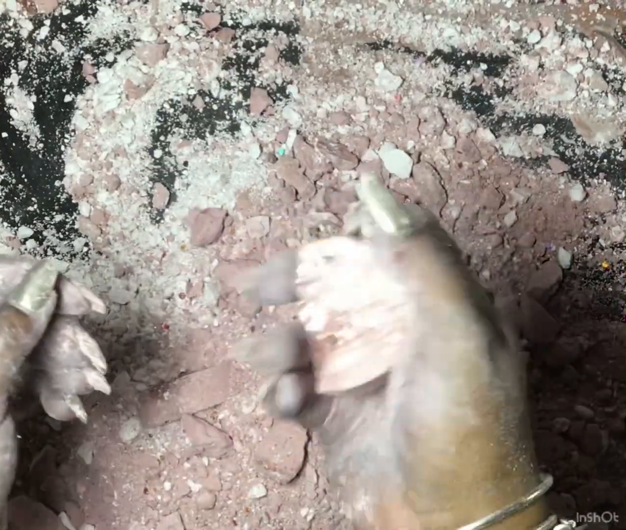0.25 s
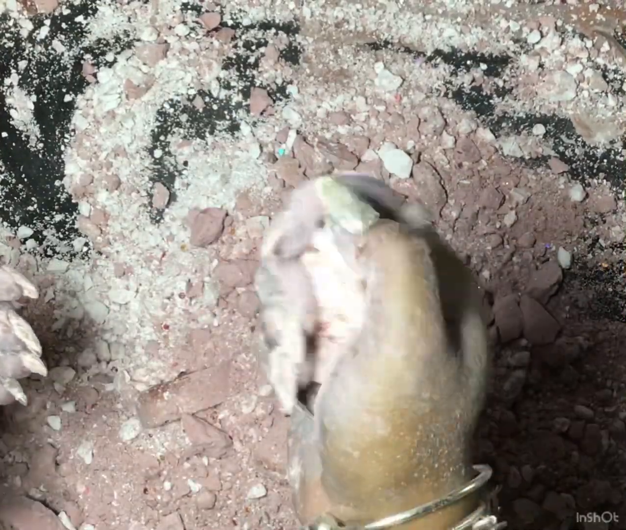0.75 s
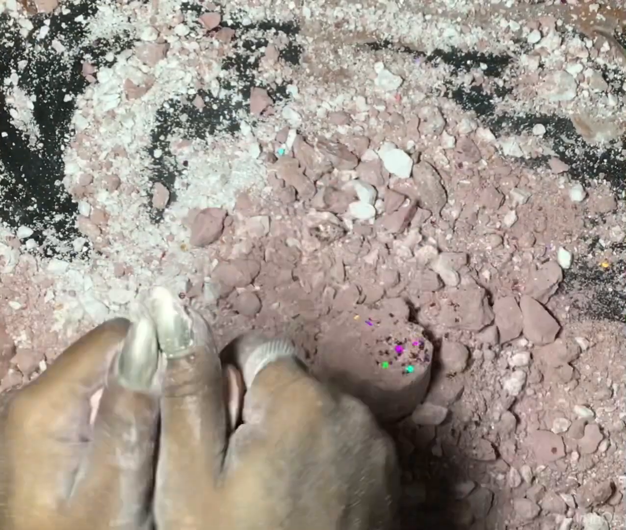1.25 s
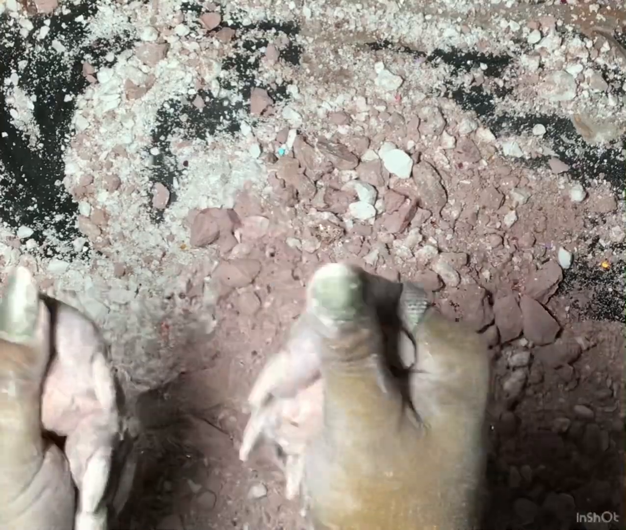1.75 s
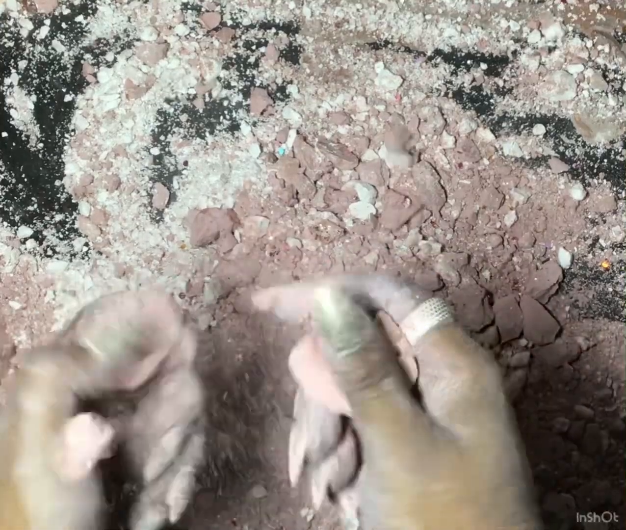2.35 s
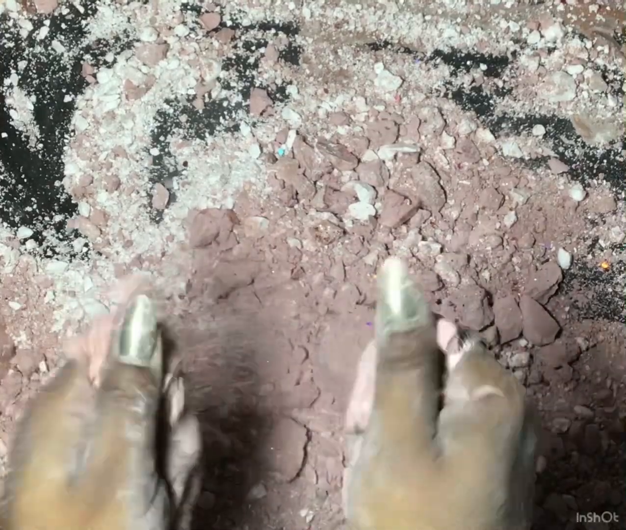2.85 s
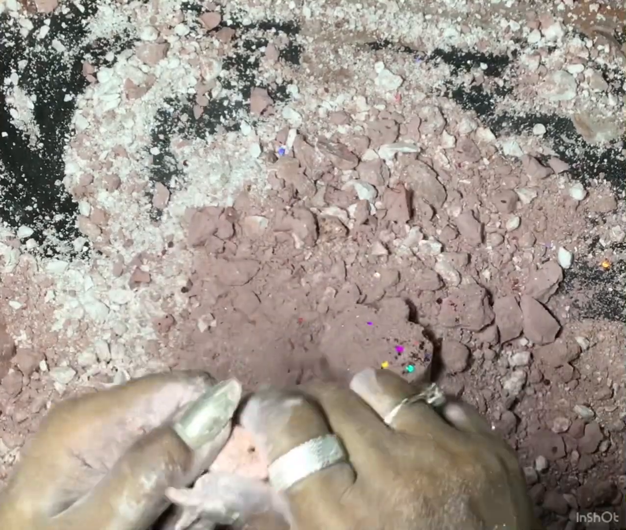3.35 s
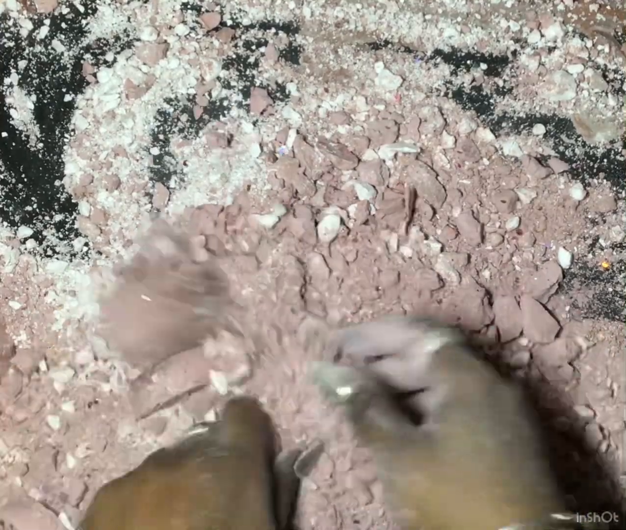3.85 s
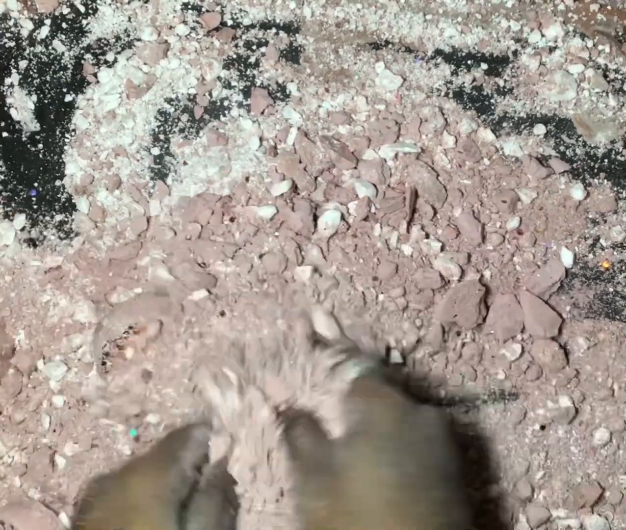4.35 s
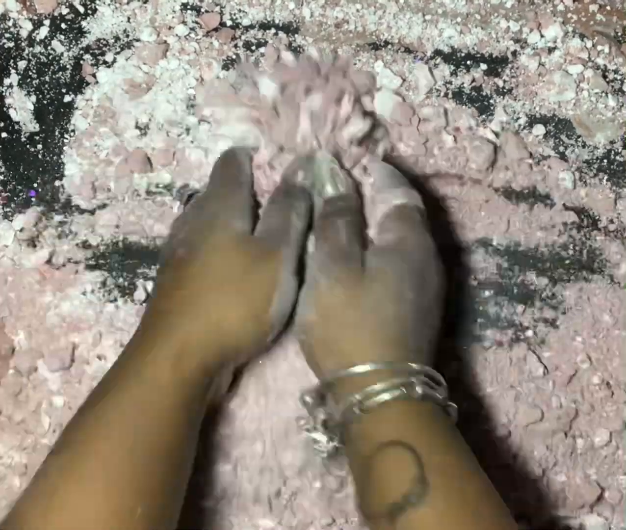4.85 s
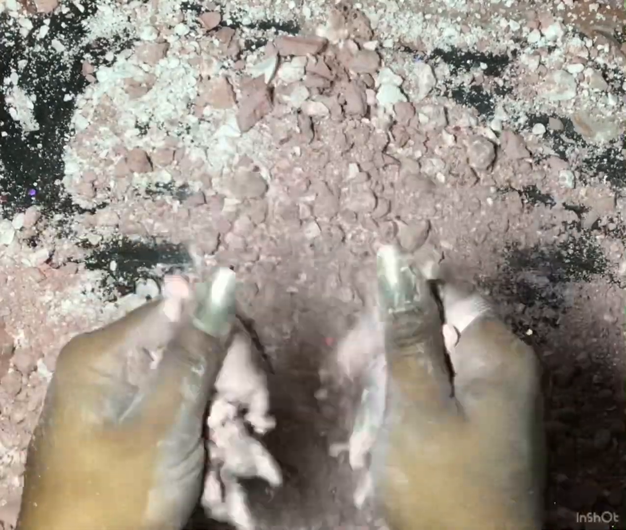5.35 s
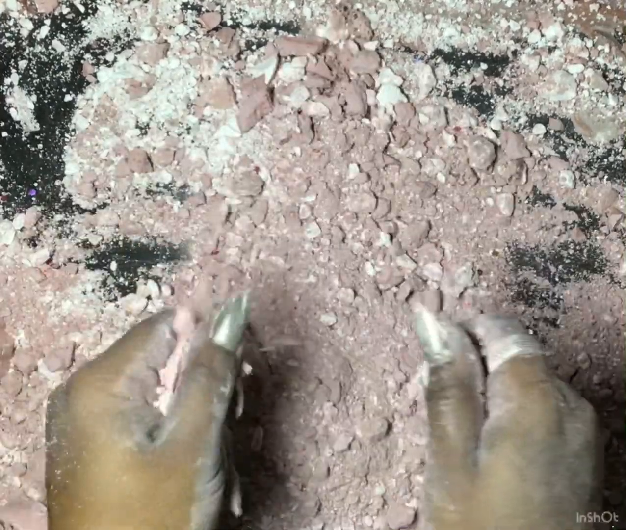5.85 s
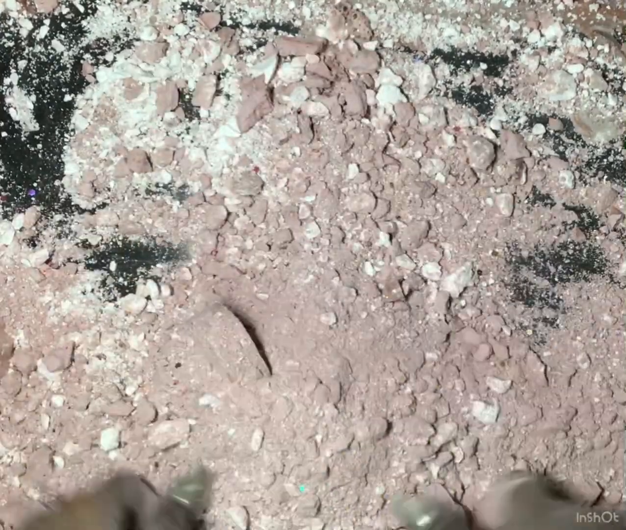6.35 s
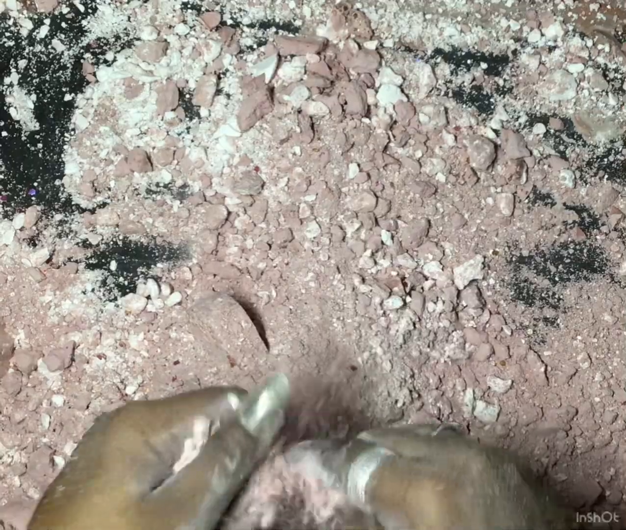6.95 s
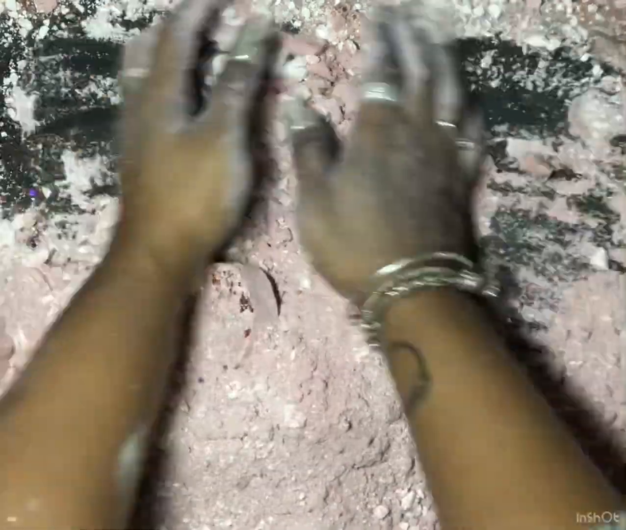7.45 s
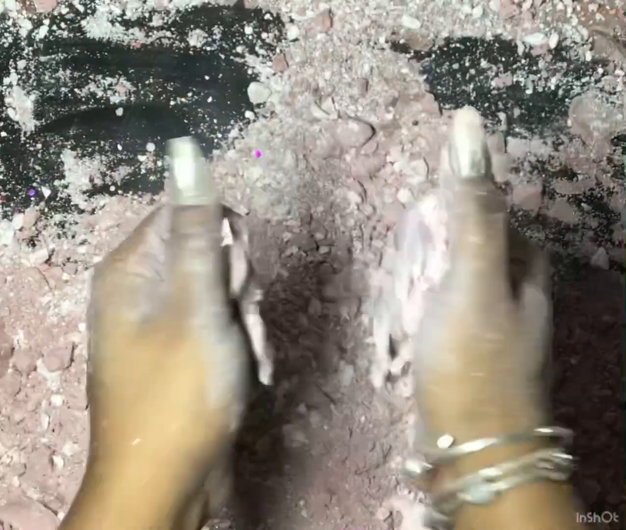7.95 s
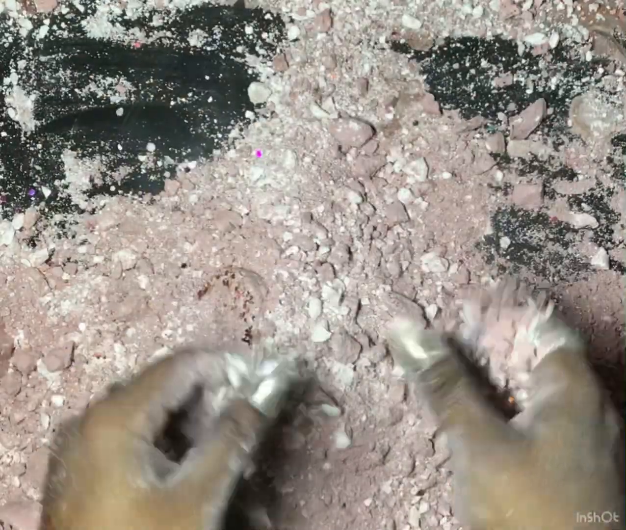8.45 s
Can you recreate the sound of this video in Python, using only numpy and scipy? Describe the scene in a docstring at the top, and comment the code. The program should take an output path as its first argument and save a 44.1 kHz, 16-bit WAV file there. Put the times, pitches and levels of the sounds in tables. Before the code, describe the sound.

Dry chalk chunks are snapped and crushed by hand close up, with sharp crackly crunches, soft tray thuds and sifting powder in a quiet room.

```python
"""Hands crush chalk chunks over a tray in a small quiet room, close to a phone.
Pieces snap as sharp bursts of noise, and lumps thud on the tray as short, uneven low tones.
Crumbs and powder sift and scrape: streams of random clicks, filtered into four pitch ranges.
Tray resonances and decaying noise echoes add a short tail, over steady noise shaped as
the room's hum and the microphone's hiss."""
import sys
import numpy as np
from scipy import signal
from scipy.fft import rfft, irfft
from scipy.io import wavfile

SR = 44100
rng = np.random.default_rng(int(sys.argv[2]) if len(sys.argv) > 2 else 0)


def dump_mix(stems):
    """Bounce the given channels to the path in sys.argv[1] as a 16-bit WAV at rate SR."""
    frames = np.atleast_2d(stems).T  # one column per channel
    limited = np.clip(frames, -1, 1)  # hard clip at full scale
    pcm = np.round(limited * 32767).astype(np.int16)
    wavfile.write(sys.argv[1], SR, pcm)


N = 384111  # length in samples, about 8.7 s


def undb(db):
    """Turns decibels into a plain multiplier."""
    return 10 ** (np.asarray(db) / 20)


def unit(x):
    """Scales a sound to an average (RMS) level of 1."""
    return x / np.sqrt(np.mean(x ** 2))


def band(x, lo_hz, hi_hz, order=2):
    """Keeps mainly the pitches between two limits."""
    return signal.sosfilt(signal.butter(order, [lo_hz, hi_hz], "bandpass", fs=SR, output="sos"), x)


def ring(x, hz, width_hz):
    """One resonance, with gain 1 at its centre; the narrower it is, the longer it rings."""
    return signal.lfilter(*signal.iirpeak(hz, hz / width_hz, fs=SR), x)


def add(out, s, sound, db):
    """Lays a short sound into out at s seconds with its peak at db."""
    start = int(s * SR)
    sound = sound[:N - start]
    out[start:start + len(sound)] += sound * undb(db) / np.max(np.abs(sound))


def grains(per_s, scatter_db, cap_db=6.0):
    """Random clicks of either sign, many small and few large, as when crumbs collide."""
    hit, size, sign = rng.random((3, N))
    click_db = np.minimum(-scatter_db * np.log(1 - size), cap_db)
    return (hit < per_s / SR) * undb(click_db) * np.sign(sign - .5)


# Tone of the quiet room. Each row: pitch in Hz, relative strength in dB per Hz.
QUIET_TONE = [(18, -51), (30, -19), (106, 0), (165, -10), (239, -2.5), (273, -11.5), (394, -7.5),
              (649, -13.5), (721, -9.5), (822, -14.5), (1160, -15.5), (1430, -18), (16000, -23)]
QUIET_DB = -58.5  # average level


def quiet():
    """Low room hum and the even hiss of the microphone, as noise with a fixed tone."""
    hz, db = np.transpose(QUIET_TONE)
    noise_hz = np.arange(1, N // 2 + 2) * SR / N
    colour = undb(np.interp(np.log(noise_hz), np.log(hz), db))
    noise = irfft(rfft(rng.standard_normal(N)) * colour, N)
    return undb(QUIET_DB) * unit(noise)


# Resonances of the tray. Each row: pitch in Hz, width in Hz, relative level in dB.
TRAY_RINGS = [(109, 11.3, 11), (733, 11, 9), (900.6, 19, 15), (1466, 60, 12.5), (1907, 55, 12.5),
              (2400, 39, 9.5), (2840, 31, -26), (3470, 16.3, 8.5), (5320, 240, 8.5)]


def room(x, near_s=0.0073, near_db=-10.5, t60_s=0.13, tail_db=-10.0, ring_db=-9.5, shift_hz=3.3):
    """Hands and tray reflect at once, the tray rings, the walls leave a short, duller tail."""
    t = np.arange(int(.3 * SR)) / SR
    out = x + sum(undb(db + ring_db) * ring(x, hz, width) for hz, width, db in TRAY_RINGS)
    turn = 2 * np.pi * shift_hz * np.arange(N) / SR
    # the hands keep moving, so the echoes drift between two patterns
    for share in np.cos(turn), np.sin(turn):
        near = rng.standard_normal(len(t)) * np.exp(-t / near_s)
        tail = rng.standard_normal(len(t)) * np.exp(-np.log(1000) * t / t60_s)  # 60 dB down at t60_s
        near = band(near, 1300, 14600, order=1)
        tail = band(tail, 190, 8400, order=1)
        echo = undb(near_db) * near / np.linalg.norm(near)
        echo += undb(tail_db) * tail / np.linalg.norm(tail)
        out += signal.fftconvolve(x * share, echo)[:N]
    return out


# Level of the top treble: full while chunks break in the raised hands, often less down on the tray.
# Each row: time in seconds, gain in dB.
TREBLE_GAIN = [(1.0, -4.5), (2.0, 3), (3.2, 6.5), (3.799, -0.5), (4.2, -1.5), (4.7, -1), (5.25, -9),
               (5.6, -15), (6.1, 5), (7.1, -3.5), (8.7, -18)]


def top_treble(chalk):
    """The top treble swells and fades: a filtered copy is added or taken away."""
    gain_db = np.interp(np.arange(N) / SR, *np.transpose(TREBLE_GAIN))
    return chalk + (undb(gain_db) - 1) * band(chalk, 10100, 16000, order=1)


# How far a band near 5 kHz dips, mostly deeper once the work moves down to the tray.
# Each row: time in seconds, share taken out from 0 to 1.
DIP_SHARE = [(1.0, .2), (3.2, 0.6), (3.8, 0.75), (7.0, 0.35), (7.4, 0.55), (8.0, 1), (8.7, 0)]
DIP_HZ, DIP_WIDTH_HZ = 5140, 1900


def treble_dip(chalk):
    """Takes a changing share of one band out of the chalk sound."""
    share = np.interp(np.arange(N) / SR, *np.transpose(DIP_SHARE)).clip(0, 1)
    return chalk - share * ring(chalk, DIP_HZ, DIP_WIDTH_HZ)


# Hand movements that set loose chalk going. Each row: time in seconds when full level is reached,
# seconds it holds, then levels in dB of tray rumble, crumb rattle, fine grit and powder hiss.
HAND_STROKES = [(1.361, .025, -69, -75, -67.5, -61.5), (1.622, .03, -60.5, -82, -65, -77),
                (1.817, .04, -74, -84, -66, -83), (2.126, .11, -51.5, -68, -57.5, -63),
                (2.281, 0.14, -57.5, -51.5, -53.5, -54), (2.469, .03, -64.5, -69, -70, -56.5),
                (2.803, .02, -63.5, -68, -61, -74), (2.948, .03, -60, -65, -54, -73),
                (3.032, 0.039, -47, -56, -68.5, -70), (3.44, 0.032, -75, -67, -75, -63.5),
                (3.903, .065, -45, -53.5, -57.5, -79), (4.035, .05, -49.5, -59, -65, -81),
                (4.127, .09, -45, -51.5, -56, -66), (4.277, .1, -59, -64, -63.5, -79),
                (4.407, .025, -63, -61, -55, -69), (4.538, .15, -51, -53, -53.5, -70),
                (4.74, 0.073, -45.5, -50, -47.5, -53), (4.874, .12, -49, -57, -59.5, -81),
                (5.043, .06, -53.5, -62, -57, -55), (5.2, .13, -50.5, -60, -54, -60),
                (5.629, .2, -57.5, -76, -63.5, -82), (5.998, .03, -71, -65, -63.5, -66),
                (6.307, 0.037, -59.5, -59, -53.5, -79), (6.405, .08, -55, -60, -63.5, -84),
                (6.56, .1, -62, -62, -66.5, -81), (6.752, 0.022, -66, -75, -64.5, -63),
                (6.846, .05, -65, -76, -63.5, -76), (7.242, 0.033, -55.5, -62, -60.5, -57.5),
                (7.33, .12, -43.5, -49, -46.5, -54.5), (7.471, .13, -43, -59, -47, -50.5),
                (7.741, .1, -49.5, -48.5, -45, -58), (7.862, .05, -62, -71, -58.5, -71),
                (8.054, .07, -57.5, -61, -60, -75), (8.541, .2, -52, -54.5, -56, -61)]
RISE_DB_PER_S, FALL_DB_PER_S = 405, 280.5  # how a movement swells and dies away
# Fingers never quite still: levels in dB of rumble, rattle, grit and hiss.
RESTLESS_DB = (-66, -73.5, -73.5, -73)
RESTLESS_FROM_S = 1.1  # they grow over the next second


def motion():
    """Levels in dB of rumble, rattle, grit and hiss: every movement rises, holds and dies away."""
    t = np.arange(N) / SR
    power = undb(RESTLESS_DB)[:, None] ** 2 * np.clip(t - RESTLESS_FROM_S, .001, 1)
    for s, hold_s, *db in HAND_STROKES:
        rise_db = RISE_DB_PER_S * (t - s)
        fall_db = FALL_DB_PER_S * (s + hold_s - t)
        shape_db = np.minimum(0, np.minimum(rise_db, fall_db))
        power = power + undb(db)[:, None] ** 2 * undb(2 * shape_db)  # doubled dB: power, not amplitude
    return 10 * np.log10(power)


def sifting(rumble_db, rattle_db, grit_db, hiss_db, slide_db=4.0):
    """Lumps drag on the tray, crumbs and grit rattle in small slides, powder falls as a dense hiss."""
    slides = undb(slide_db * unit(band(rng.standard_normal(N), 12.0, 45, order=1)))
    rumble = unit(band(grains(500, 2.0), 86, 307))
    rattle = unit(band(slides * grains(900, 2.9), 333, 1000))
    grit = unit(band(slides * grains(2200, 2.7), 1270, 3400, order=1))
    hiss = unit(band(np.sqrt(slides) * grains(11000, 4.8), 4400, 10500))
    low = undb(rumble_db) * rumble + undb(rattle_db) * rattle
    high = undb(grit_db) * grit + undb(hiss_db) * hiss
    return low + high


# Lumps and palms landing on the tray. Each row: start in seconds, peak in dB, pitch in Hz.
TRAY_THUDS = [(1.107, -29.5, 199), (1.64, -35, 271), (1.648, -46, 300), (1.659, -41, 260),
              (1.673, -51, 260), (2.076, -30.5, 168), (3.046, -34, 173), (3.239, -27.5, 224),
              (3.708, -31, 313), (3.911, -30, 196), (3.934, -30, 150), (3.964, -26, 162), (4.006, -34, 215),
              (4.028, -25, 214), (4.039, -25.5, 200), (4.217, -39, 229), (5.982, -39, 249),
              (4.051, -22, 227), (4.147, -26.5, 235), (4.178, -20, 230), (4.2, -26, 213),
              (4.7328, -14, 380), (4.742, -38, 275), (4.781, -29, 210), (4.9, -26, 324), (4.956, -29, 226),
              (5.152, -34, 235), (5.25, -32.5, 247), (5.588, -31.5, 340), (6.057, -28, 372),
              (6.406, -23, 221), (7.055, -39.5, 209), (7.325, -30, 207), (7.357, -27, 201),
              (7.402, -25, 230), (7.417, -28.5, 200), (7.426, -25, 460), (7.434, -35, 230),
              (7.469, -35, 197), (7.495, -29, 330), (7.511, -24, 325), (7.531, -27, 230), (7.598, -37, 317),
              (7.565, -29, 203), (7.608, -41, 269), (7.687, -30.5, 228), (7.747, -33, 296),
              (7.985, -30.5, 323), (8.034, -24, 613), (8.0399, -20.5, 580), (8.041, -20.5, 300),
              (8.047, -29, 540), (8.532, -35, 311), (8.685, -35, 152)]


def thuds(turns=1.26, push_s=0.00055, rough=0.57):
    """A soft blow bends the tray for a few cycles; its other modes make the ring uneven."""
    out, t = np.zeros(N), np.arange(int(.12 * SR)) / SR
    for s, db, hz in TRAY_THUDS:
        uneven = unit(band(rng.standard_normal(len(t)), 0.46 * hz, 1.39 * hz))
        swing = (1 - np.exp(-t / push_s)) * np.exp(-t * hz / turns)
        blow = (rough * uneven - np.sin(2 * np.pi * hz * t)) * swing
        add(out, s, band(blow, 66, 1140, order=1), db)
    return out


# Small breaks at random moments; the snap and knock levels count from the grit level,
# the splinter level from the powder hiss level.
CHIP_COUNT, CROWDING = 80, 0.54  # more crowding: more of them fall where the chalk moves most
CHIP_DB, CHIP_KNOCK_DB, CHIP_SPLINTER_DB, CHIP_SCATTER_DB = -2, 8.5, 19.5, 5
CHIP_HZ, PITCH_SPREAD = 2515, 0.26  # middle snap pitch, and its spread as a natural-log ratio


def scattered(level_db, count):
    """Random moments, denser where the level is high: time, level there, and four chance values each."""
    share = np.cumsum(undb(CROWDING * level_db))
    target = (np.arange(count) + rng.random(count)) / count * share[-1]
    i = np.searchsorted(share, target).clip(0, N - 99)
    return i / SR, level_db[i], rng.standard_normal((count, 4)).T


def chips(grit_db, hiss_db):
    """Crumbs that break among the moving chalk, as rows for cracks(); brighter where powder flies."""
    s, db, (a, b, c, d) = scattered(grit_db, count=CHIP_COUNT)
    snap_db = db + CHIP_DB + CHIP_SCATTER_DB * a
    snap_hz = CHIP_HZ * np.exp(PITCH_SPREAD * b)
    knock_db = db + CHIP_KNOCK_DB + CHIP_SCATTER_DB * c
    splinter_db = hiss_db[(s * SR).astype(int)] + CHIP_SPLINTER_DB + CHIP_SCATTER_DB * d
    return list(zip(s, snap_db, snap_hz, knock_db, splinter_db))


# Clear breaks of the chalk. Each row: start in seconds, snap peak in dB, snap pitch in Hz,
# peak in dB of the lump's knock, peak in dB of the bright splinter.
CHALK_CRACKS = [(.82, -44, 2200, -68, -38), (1.383, -37.5, 3470, -47, -41), (1.394, -46, 3400, -66, -55),
                (1.642, -42, 3230, -57, -60), (1.84, -45, 3000, -65, -65), (1.0174, -33, 5200, -51, -8.5),
                (1.054, -35, 4730, -47, -31), (1.1055, -37.5, 2500, -31.5, -43),
                (2.0743, -42.5, 2500, -36.5, -60), (2.091, -56, 3350, -62, -27),
                (2.1397, -13.5, 5000, -27.5, -37), (2.149, -15, 5400, -19, -26),
                (2.167, -16, 5570, -54, -28), (2.172, -29, 3400, -46, -18), (2.1795, -50, 5000, -60, -35),
                (2.2187, -40, 4000, -41, -30), (2.1892, -1.5, 4740, -21.5, 0),
                (2.2255, -23, 2270, -32.5, -20), (2.2725, -32, 3980, -50, -27),
                (2.2745, -14.5, 2820, -25.5, -47), (2.311, -27, 3820, -54, -33),
                (2.34, -16, 1390, -29, -32), (2.3482, -9, 1390, -32, -24), (2.3515, -6.5, 2750, -38, -20),
                (2.3805, -44, 2130, -50, -25), (2.4096, -22, 3860, -30.5, -32),
                (2.437, -53, 3000, -40, -26), (2.5126, -36.5, 3270, -46, -47),
                (2.5544, -19, 3320, -39, -10), (2.6268, -40.5, 3230, -50, -37),
                (2.8138, -38, 3730, -42.5, -39), (2.9, -38, 3330, -46, -50),
                (2.9254, -21.5, 3420, -44, -27), (2.9315, -37, 3000, -51, -19),
                (2.938, -44, 3500, -52, -30), (2.997, -35, 2010, -42, -55), (3.0235, -36, 2400, -48, -48),
                (3.199, -42, 3480, -53, -58), (2.9462, -13.5, 3600, -24, -15),
                (3.0056, -51, 3270, -42, -16.5), (3.0419, -31.5, 1750, -27, -52),
                (3.2376, -41, 2340, -35.5, -56), (3.7091, -33.5, 1850, -30.5, -35),
                (3.7533, -37, 2200, -41.5, -59), (3.777, -44, 2200, -46, -42), (3.787, -47, 2200, -47, -39),
                (3.898, -41, 1900, -37.5, -35.5), (3.913, -45, 1900, -40, -55),
                (4.0063, -60, 2000, -56, -50), (4.083, -45, 2300, -56, -37.5),
                (3.9263, -38, 1940, -36, -54), (3.954, -27, 2010, -29, -50),
                (4.0265, -49, 1900, -32.5, -55), (4.058, -38, 1980, -33, -53),
                (4.1615, -35, 3210, -40, -31), (4.1905, -35, 2820, -46, -17.5),
                (4.398, -36, 2700, -47, -36), (4.5795, -38, 2500, -36, -45), (4.6258, -37, 2090, -36, -45),
                (4.69, -19, 1900, -23, -12), (4.7339, -22, 2390, -23.5, -18),
                (4.771, -27.5, 3120, -50, -44), (4.7833, -27, 2050, -47, -31), (4.876, -42, 3000, -52, -48),
                (4.922, -42, 2804, -52, -53), (5.035, -41, 2370, -55, -50), (5.187, -41, 3200, -52, -48),
                (4.8878, -34, 1970, -31, -56), (4.901, -38, 1840, -24.5, -44),
                (4.943, -31.5, 2100, -45, -50), (5.0782, -29.5, 2370, -38.5, -30),
                (5.1078, -23.5, 2620, -31.5, -47), (5.2153, -37, 2580, -57, -44),
                (5.247, -9.5, 3200, -25.5, 5.5), (5.2676, -20, 2590, -27.5, -14),
                (5.3626, -31, 3540, -40, -20), (5.4144, -29, 2440, -26.5, -26),
                (5.4918, -36, 2530, -36.5, -34), (5.509, -32.5, 2340, -36.5, -33),
                (5.582, -14.5, 2460, -24.5, -13), (5.6277, -31.5, 2460, -37, -33),
                (5.649, -28.5, 3120, -40, -20), (5.745, -44, 2800, -54, -50), (5.796, -54, 3200, -51, -54),
                (5.7607, -26, 1960, -33.5, -32), (5.9266, -32.5, 2250, -36.5, -55),
                (6.0028, -37, 2900, -39, -31), (6.046, -52, 4500, -67, -47), (6.28, -46, 3020, -64, -54),
                (6.0572, -18.5, 1900, -25.5, -25), (6.0855, -52, 2635, -63, -36),
                (6.3008, -52, 2160, -35.5, -43), (6.3216, -50, 2260, -42, -46),
                (6.4033, -29, 2410, -30.5, -31.5), (6.8361, -46, 1784, -41.5, -41),
                (6.869, -48, 2300, -45, -32), (6.95, -52.5, 2250, -38.5, -31),
                (7.0512, -26.5, 1480, -40, -45), (7.053, -24, 3160, -24, -35), (7.237, -37, 1820, -43, -50),
                (7.271, -32.5, 2030, -41, -22), (7.292, -35, 3460, -44, -26),
                (7.4885, -43, 2060, -27.5, -34), (7.629, -56, 2640, -60, -45),
                (7.3208, -19, 3150, -26.5, -3.5), (7.3446, -21, 2310, -30.5, -18),
                (7.3574, -47, 2920, -35, -6.5), (7.4103, -33, 2470, -25.5, -25.5),
                (7.5315, -33, 2150, -25, -29), (7.5685, -24, 2930, -51, -23),
                (7.6988, -20.5, 2120, -26.5, -34), (7.7365, -8.5, 2620, -21, -20),
                (7.7459, -10.5, 2720, -14.5, -44), (7.755, -36, 2600, -29, -24),
                (7.905, -47, 3000, -58, -50), (7.94, -50, 1970, -54, -54), (7.7612, -35, 2240, -35, -11),
                (7.777, -3.5, 3180, -26, -23), (7.7938, -35, 2650, -24, -5.5),
                (7.816, -20.5, 2470, -34, -27), (7.837, -16.5, 2770, -31, -31),
                (7.8415, -32, 3200, -36, -4.5), (7.8753, -35, 3090, -41, -21),
                (7.9775, -22, 2100, -25, -42), (7.982, -25, 2390, -27, -32), (8.0334, -1.5, 3490, -20, -26),
                (8.087, -37, 3780, -41, -28), (8.1103, -22, 2850, -53, -23),
                (8.1512, -31.5, 2540, -47, -29), (8.2199, -43, 2550, -50, -62),
                (8.233, -16.5, 2900, -31.5, -8.5), (8.4487, -34.5, 3520, -50, -48),
                (8.477, -34, 3020, -45.5, -28.5), (8.5449, -25, 2200, -32, -29),
                (8.5795, -29.5, 2240, -27.5, -46), (8.615, -39, 2600, -35, -48),
                (8.676, -21.5, 2850, -34, -24.5)]


def cracks(rows, run_s=0.0017, crumble=0.0066, turns=0.93, knock_s=0.0023, splinter_s=0.0011,
           give=4.68, small=0.59):
    """Each fracture gives at once, then runs on as a burst of slips; the piece rings a cycle or two."""
    out, t = np.zeros(N), np.arange(int(.04 * SR)) / SR
    for s, snap_db, hz, knock_db, splinter_db in rows:
        slips = rng.standard_normal((3, len(t)))
        slow = np.exp(crumble * (knock_db - splinter_db))  # dull breaks crumble on, bright ones snap clean
        chip = (hz / 2600) ** small  # small pieces snap high and knock short
        # strong splinters reach highest
        top_hz = np.clip(12000 * np.exp(0.02 * (splinter_db - snap_db)), 6000, 18000)
        slips[:, 0] = -give / slow  # the sudden first give
        snap = slips[0] * np.exp(-t / run_s / slow)
        knock = slips[1] * np.exp(-t / knock_s / slow * chip)
        splinter = slips[2] * np.exp(-t / splinter_s)
        spread = 1 + .5 / turns
        add(out, s, band(snap, hz / spread, hz * spread), snap_db)
        add(out, s, band(knock, 307, 1224 * np.sqrt(chip)), knock_db)
        add(out, s, band(splinter, 3700, top_hz), splinter_db)
    return out


def scene():
    """Chalk breaks, thuds and sifts in the room, its treble shifts, and the quiet lies underneath."""
    rumble_db, rattle_db, grit_db, hiss_db = motion()
    breaks = cracks(CHALK_CRACKS + chips(grit_db, hiss_db))
    loose = sifting(rumble_db, rattle_db, grit_db, hiss_db)
    chalk = room(breaks + thuds() + loose)
    chalk = top_treble(treble_dip(chalk))
    return (chalk + quiet())[None]


def record(dry):
    """The phone drops the deepest bass, clips at full scale and cuts the top."""
    dry = signal.sosfilt(signal.butter(3, 48, "highpass", fs=SR, output="sos"), dry)
    top_cut = signal.ellip(8, .2, 70, 15900, fs=SR, output="sos")  # cuts above 15900 Hz
    return signal.sosfilt(top_cut, np.clip(dry, -1, 1))


dry = scene()
out = record(dry)
dump_mix(out)
```